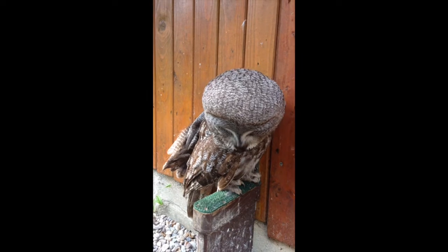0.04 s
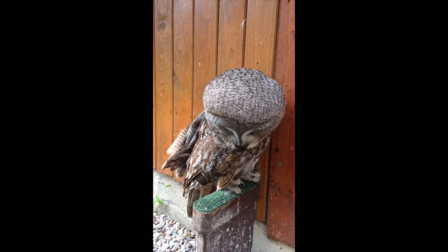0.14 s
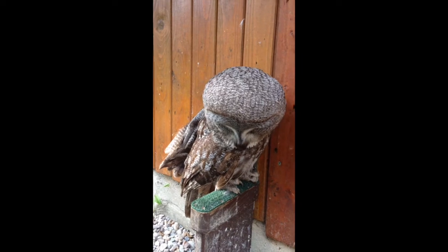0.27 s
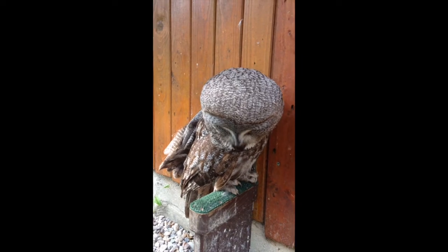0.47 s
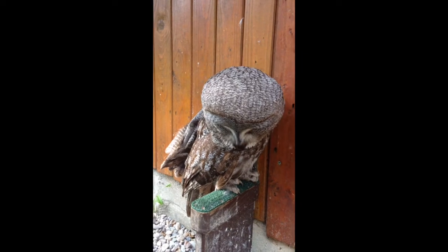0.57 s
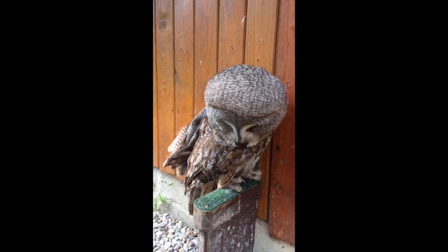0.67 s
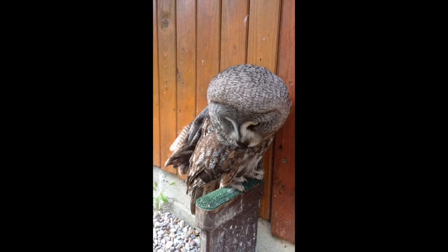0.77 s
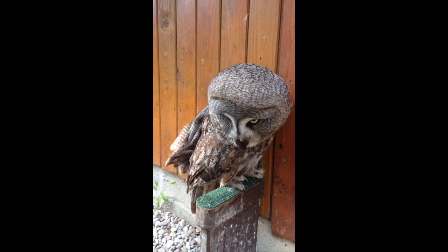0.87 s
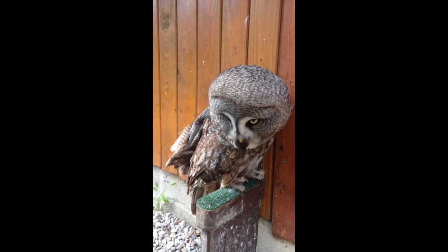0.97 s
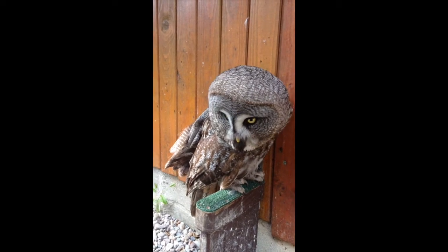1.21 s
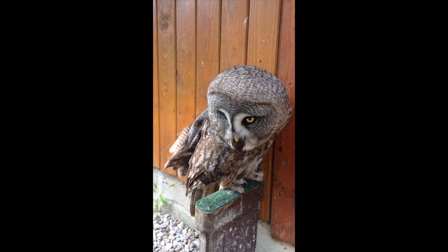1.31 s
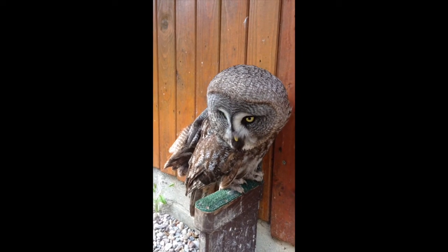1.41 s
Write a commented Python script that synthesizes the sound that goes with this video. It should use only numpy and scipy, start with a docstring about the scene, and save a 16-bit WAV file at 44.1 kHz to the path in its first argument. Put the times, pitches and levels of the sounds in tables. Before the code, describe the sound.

An owl gives one short, soft hoot over faint background hiss.

```python
"""By a wooden wall, in a quiet enclosure. An owl perched there gives one short, soft, whistled hoot
that arches in pitch, its loudness dipping briefly near the top as a wall echo interferes. The walls
send a few quick echoes and a faint tail to the microphone, over airy hiss, hum and two faint rustles.
The recorder's noise suppressor opens on the hoot and slowly closes, so the hiss swells and sinks."""
import sys
import numpy as np
from scipy import signal
from scipy.io import wavfile
from scipy.ndimage import uniform_filter1d

SR = 44100
rng = np.random.default_rng(int(sys.argv[2]) if len(sys.argv) > 2 else 0)


def file_out(sig):
    """Save sig as 16-bit WAV at sys.argv[1]."""
    # one column per channel
    cols = np.atleast_2d(sig).T
    # limit, then scale
    lim = np.clip(cols, -1, 1)
    pcm = np.round(lim * 32767).astype(np.int16)
    wavfile.write(sys.argv[1], SR, pcm)


N = 63945
TIME = np.arange(N) / SR

# Pitch arch of the hoot: (time [s], pitch [Hz])
HOOT_PITCH = [(.207, 997), (.222, 1045), (.240, 1100), (.250, 1160), (.258, 1117), (.275, 1103),
              (.298, 1099), (.311, 1117), (.321, 1034), (.328, 1067), (.334, 874), (.343, 855)]
# Loudness of the hoot's fundamental, with the wall echo's dip drawn in: (time [s], rms level [dB])
HOOT_LEVEL = [(.204, -51), (.214, -34), (.228, -28), (.237, -17.5), (0.245, -23), (.252, -32.5),
              (.258, -23), (0.279, -23.5), (0.311, -26.5), (0.319, -25.5), (.324, -42), (0.332, -36),
              (0.345, -52.5)]
# Overtones, heard only while the voice is pressed:
# (harmonic number, top rms level [dB], strongest at [s], rise [s], fall [s])
HOOT_OVERTONES = [(2, -56.5, 0.311, 0.097, .022), (3, -56.5, 0.2895, 0.024, 0.021),
                  (4, -48.5, 0.262, 0.018, 0.037), (5, -48.5, 0.2656, 0.019, 0.046)]
# Echoes off the nearby walls: (delay [s], level against the direct sound [dB])
WALL_ECHOES = [(0.0126, -22), (.031, -27), (.045, -33)]
# Faint rustles in the background: (time [s], top rms level [dB], half width [s], centre [Hz])
RUSTLE_PUFFS = [(1.175, -56, 0.0058, 250), (1.257, -50, 0.012, 1310)]
# Spectrum of the background air and hiss: (frequency [Hz], relative spectral density [dB])
AIR_SPECTRUM = [(40, -27.5), (70, -11.5), (115, -1.5), (200, -1), (400, -4), (600, -6.0), (1000, -4.5),
                (1600, -7), (2300, -9), (2800, -13.5), (3800, -12.5), (7000, -15.5), (14000, -17)]
# Faint background hum: (frequency [Hz], rms level [dB])
HUM_TONES = [(200, -66), (300, -69)]


def owl_hoot(jitter_share=0.0045, jitter_per_s=180, flutter_db=1.2, flutter_per_s=60, fade_s=.004):
    """A nearly pure arched tone that breaks downward at its end, with thin overtones in its middle."""
    pitch_hz = curve(HOOT_PITCH) * (1 + jitter_share * drift(jitter_per_s))
    phase = 2 * np.pi * np.cumsum(pitch_hz) / SR
    voice = from_db(curve(HOOT_LEVEL)) * np.sin(phase)
    for harmonic, db, strongest, rise, fall in HOOT_OVERTONES:
        pressed = swell(strongest, np.where(TIME < strongest, rise, fall))
        voice += from_db(db + flutter_db * drift(flutter_per_s)) * pressed * np.sin(harmonic * phase)
    start, end = HOOT_LEVEL[0][0], HOOT_LEVEL[-1][0]
    fade = np.clip(np.minimum(TIME - start, end - TIME) / fade_s, 0, 1)
    return np.sqrt(2) * voice * fade


def enclosure(call, tail_db=-28.5, tail_t60_s=0.3):
    """What the walls return to the microphone: quick echoes and a weak diffuse tail."""
    echoes = sum(from_db(db) * np.interp(TIME - delay, TIME, call) for delay, db in WALL_ECHOES)
    first_echo_s = WALL_ECHOES[0][0]
    tail = rng.standard_normal(N) * from_db(-60 * TIME / tail_t60_s) * (TIME > first_echo_s)
    return echoes + from_db(tail_db) * signal.fftconvolve(call, tail / np.linalg.norm(tail))[:N]


def rustles():
    """Short soft puffs of noise, two octaves wide, well after the hoot."""
    return sum(from_db(db) * swell(time, width) * unit_rms(band(rng.standard_normal(N), hz / 2, hz * 2))
               for time, db, width, hz in RUSTLE_PUFFS)


def air(rms_db=-48, flicker_db=2, flicker_per_s=13.1, flicker_below_hz=3500):
    """The ambience of the place: quarter-octave noise bands, the lower ones flickering slightly."""
    edges_hz = 40 * 2 ** (np.arange(36) / 4)
    white = rng.standard_normal((2, N))   # neighbouring bands take different noise
    hz, db = np.transpose(AIR_SPECTRUM)
    bed = np.zeros(N)
    for k, (low, high) in enumerate(zip(edges_hz, edges_hz[1:])):
        band_db = np.interp(np.log(low * high) / 2, np.log(hz), db)
        wander_db = flicker_db / (1 + low / flicker_below_hz) * drift(flicker_per_s)
        bed += from_db(band_db + wander_db) * band(white[k % 2], low, high)
    return from_db(rms_db) * unit_rms(bed)


def hum():
    """Steady low tones, almost buried in the air."""
    return sum(np.sqrt(2) * from_db(db) * np.sin(2 * np.pi * (hz * TIME + rng.random()))
               for hz, db in HUM_TONES)


def noise_suppressor(x, open_above_db=-25, depth_db=4.5, open_s=0.02, close_db_per_s=11):
    """The recorder turns quiet sound down; it opens quickly on anything loud and closes slowly."""
    level_db = 10 * np.log10(np.maximum(uniform_filter1d(x ** 2, size=256), 1e-12))
    opening_db = np.clip(level_db - open_above_db + depth_db, 0, depth_db)
    closing_db = close_db_per_s * TIME
    held_db = np.maximum.accumulate(opening_db + closing_db, axis=-1) - closing_db
    pole = np.exp(-1 / (open_s * SR))
    smoothed_db = signal.lfilter([1 - pole], [1, -pole], held_db)
    return x * from_db(smoothed_db - depth_db)


def from_db(db):
    """Decibels to gain."""
    return 10 ** (np.asarray(db) / 20)


def unit_rms(x):
    """Scale to unit rms."""
    return x / np.sqrt(np.mean(x ** 2) + 1e-20)


def curve(points):
    """Join (time, value) points by straight lines."""
    return np.interp(TIME, *np.transpose(points))


def drift(rate_hz):
    """Smooth random wander of spread 1."""
    hop, settle = 40, 2000   # samples per step; steps for the filter to settle
    pole = np.exp(-2 * np.pi * rate_hz * hop / SR)
    white = rng.standard_normal(N // hop + settle + 2)
    slow = signal.lfilter([1], [1, -2 * pole, pole * pole], white)[settle:]
    return np.interp(np.arange(N) / hop, np.arange(len(slow)), unit_rms(slow))


def band(x, low_hz, high_hz):
    """Gentle band-pass."""
    return signal.sosfilt(signal.butter(2, [low_hz, high_hz], "band", fs=SR, output="sos"), x)


def swell(centre_s, width_s):
    """A bell-shaped rise and fall."""
    return np.exp(-((TIME - centre_s) / width_s) ** 2)


def scene():
    """At the microphone, in mono: the owl and its enclosure over the background."""
    call = owl_hoot()
    return (call + enclosure(call) + air() + hum() + rustles())[None]


def record(dry, cutoff_hz=15300):
    """The recorder: noise suppression, then a steep cut of the top treble."""
    low_pass = signal.ellip(12, .1, 80, cutoff_hz, fs=SR, output="sos")
    return signal.sosfilt(low_pass, noise_suppressor(dry))


dry = scene()
out = record(dry)
file_out(out)
```